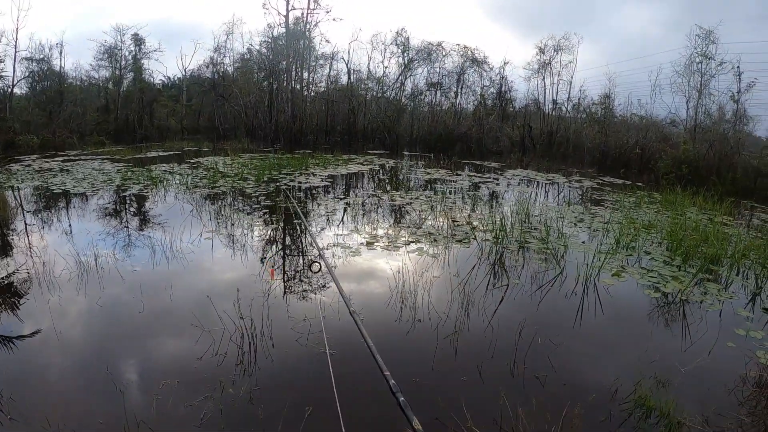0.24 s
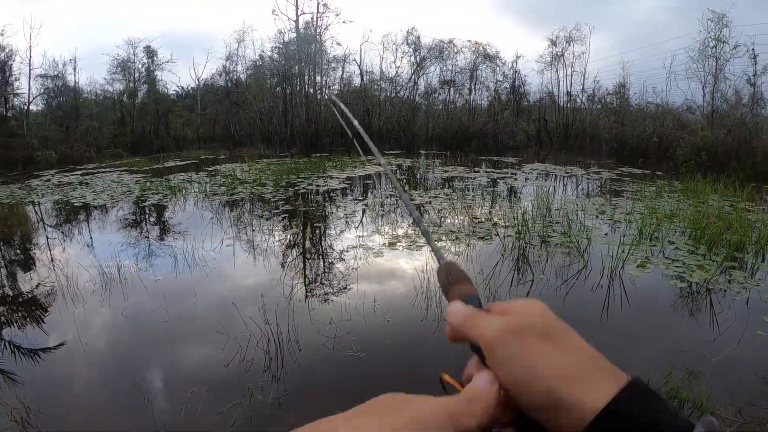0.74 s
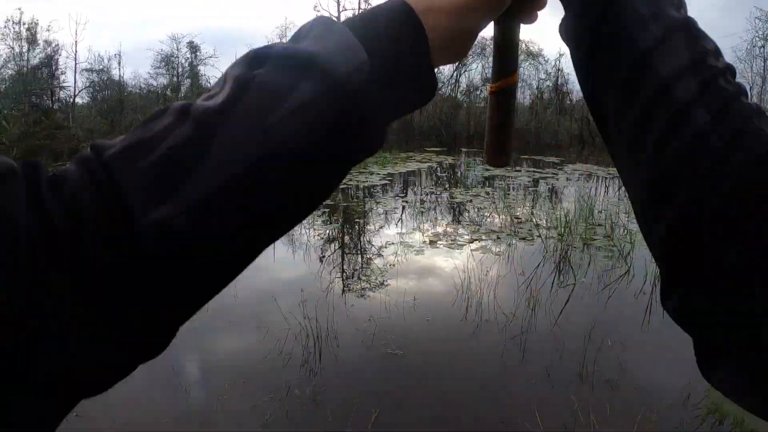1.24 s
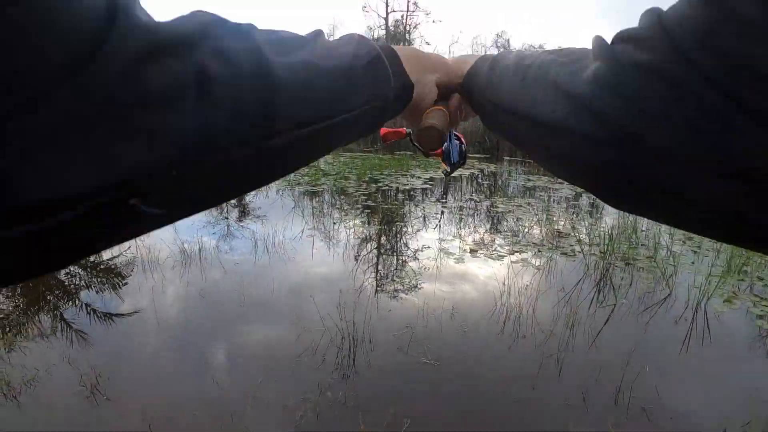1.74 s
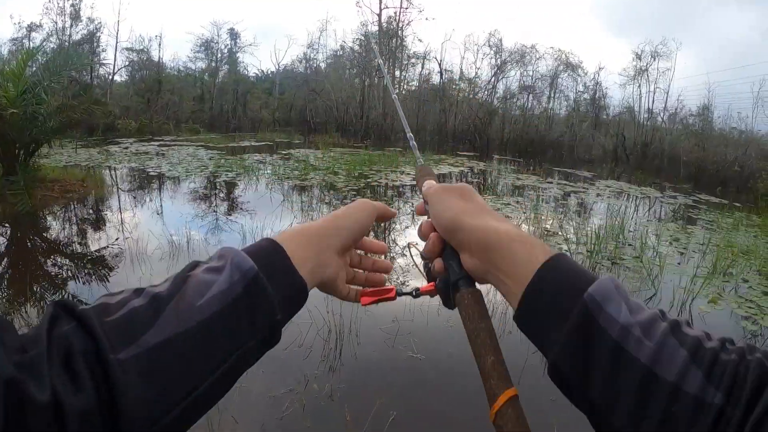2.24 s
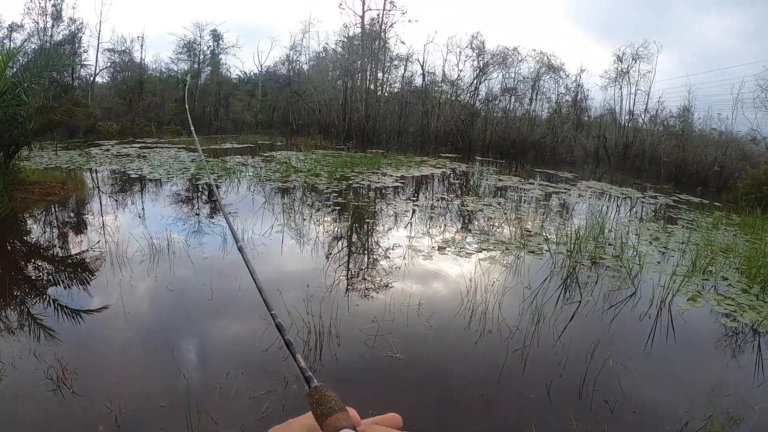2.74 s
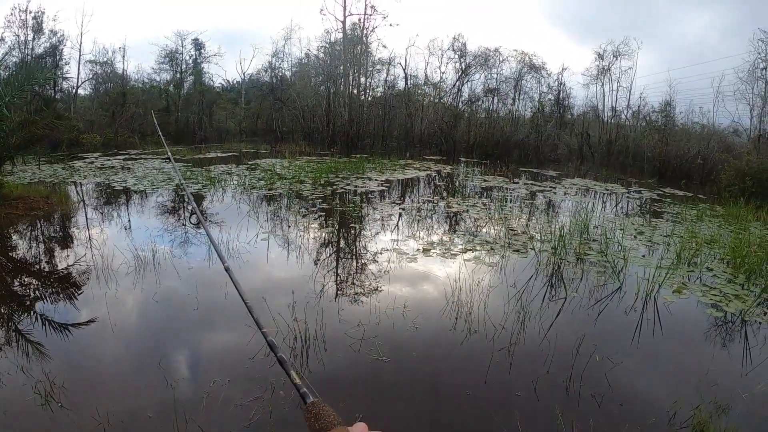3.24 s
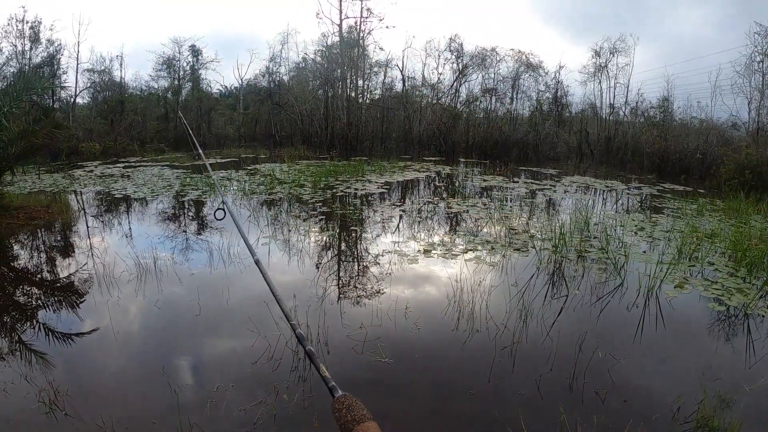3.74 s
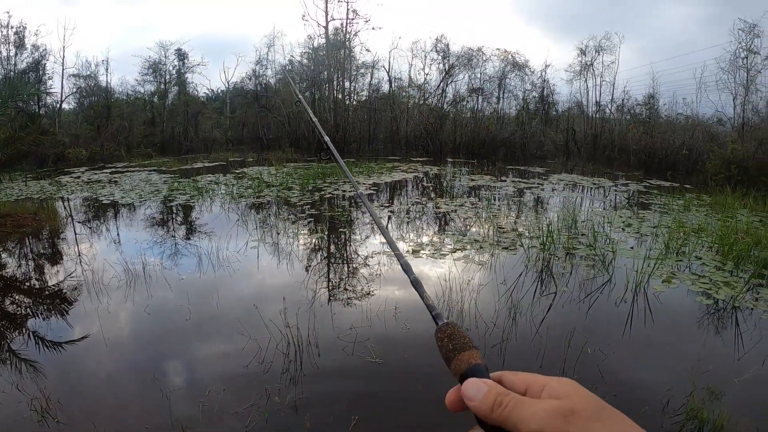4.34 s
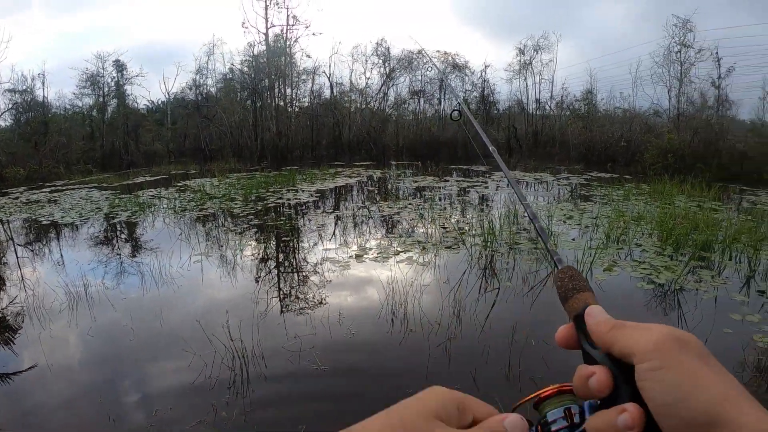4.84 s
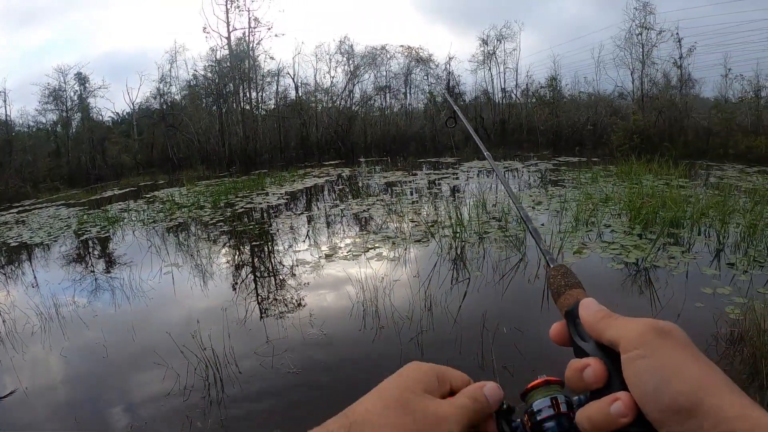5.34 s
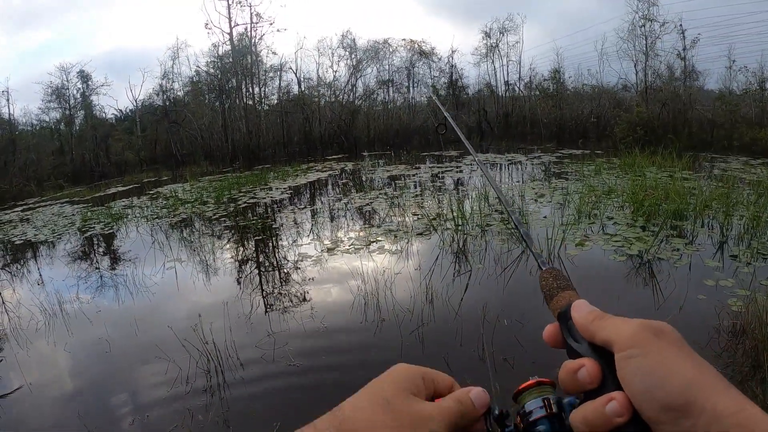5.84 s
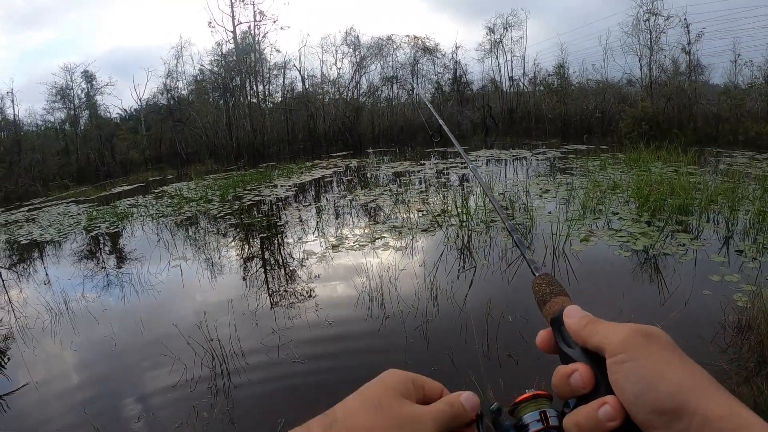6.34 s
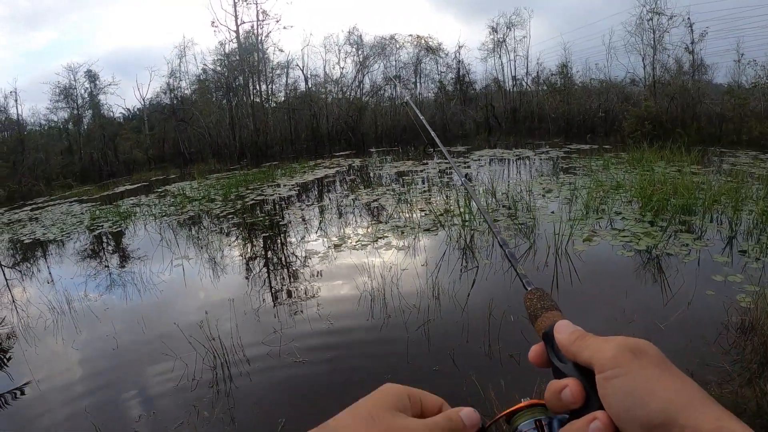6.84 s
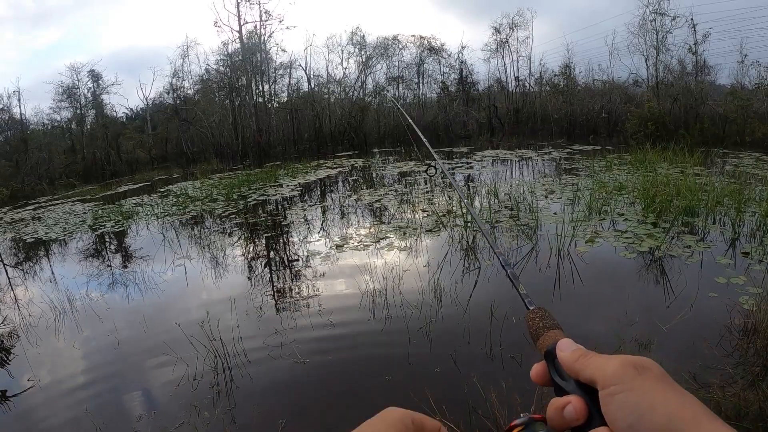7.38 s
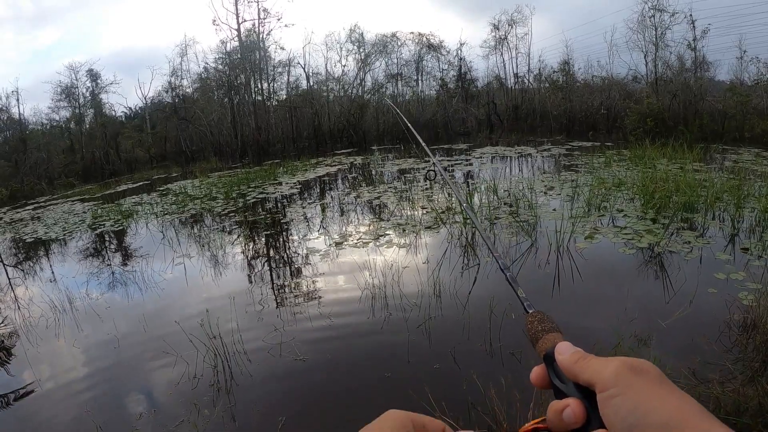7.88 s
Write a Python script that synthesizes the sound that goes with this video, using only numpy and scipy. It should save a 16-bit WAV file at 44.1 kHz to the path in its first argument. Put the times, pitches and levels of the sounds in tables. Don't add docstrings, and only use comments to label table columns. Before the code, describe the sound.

A bird repeats a short falling note among echoing chirps at a marshy pond, with one quick casting whoosh, line hiss and small tackle clicks.

```python
import sys
import numpy as np
from scipy import signal
from scipy.io import wavfile
from scipy.ndimage import uniform_filter1d

SR = 44100
rng = np.random.default_rng(int(sys.argv[2]) if len(sys.argv) > 2 else 0)


def natural_amplitude(level_db):
    exponent = np.asarray(level_db, float) / 20
    return 10 ** exponent


def to_wav(sig):
    pcm = np.clip(np.atleast_2d(sig), -1, 1) * 32767
    pcm = np.round(pcm).astype(np.int16)
    wavfile.write(sys.argv[1], SR, pcm.T)


N = 357651
T = np.arange(N) / SR

# after_start_s, pitch_hz, level_db
FALLING_NOTE = [(0.0, 4250, -2), (.008, 5236, 10.5), (0.015, 5673, 3), (.019, 5557, 10), (.027, 5290, 5.5),
                (.04, 5040, 4.5), (.066, 4250, 3), (0.079, 3750, -1), (0.101, 3060, -7)]
# start_s, level_db, hook_db, loss_by_end_db, stretch_ratio
FALLING_NOTE_REPEATS = [(0.687, -36.5, -33, 9.5, 0.85), (1.327, -47, -20, 5, 1.16),
                        (1.985, -46, -24, -4.5, 1.1), (2.651, -42, -13, 4, 1.06),
                        (3.304, -36, -32, 3, 0.86), (3.989, -38, -7.5, 5, 1.08),
                        (4.681, -39.5, -5, -2, 0.99), (6.072, -36.5, -17, 4, 0.96),
                        (6.855, -38.5, -11, -2, 0.96), (7.682, -34, -7.5, 10, 1.16)]
# after_start_s, pitch_hz, level_db
WARBLE_FIGURE = [(0, 2904, -6), (.07, 3150, -2.5), (.27, 2960, -3), (.3, 3400, 2.5), (.33, 3640, 5.5),
                 (.37, 3646, -17)]
CLIMB_FIGURE = [(0, 3936, -3), (.008, 4100, 5), (.014, 4876, -3), (.022, 4400, 7.5), (.032, 4980, 4),
                (.039, 4510, -4), (.05, 5300, -6), (.057, 4850, 8), (.068, 4830, -5), (.074, 5800, 0),
                (.084, 4870, -13)]
STAIRS_FIGURE = [(0, 4606, -1.5), (.065, 4324, 4.5), (.098, 3950, -1.5), (.108, 3850, -5), (.122, 3624, 3),
                 (.2, 3540, 4.5), (.232, 3400, 5), (.245, 2930, -3), (.272, 2330, -14)]
# start_s, stretch_ratio, level_db, left_right_db
WARBLE_TIMES = [
    (.105, 1.03, -36.5, 3.5),
    (6.671, .96, -37, 4),
]
CLIMB_TIMES = [
    (1.175, 1.001, -38.5, 0.1),
    (7.699, 1.01, -46, 0.92),
]
STAIRS_TIMES = [
    (1.398, 1.001, -37, 1.5),
    (7.93, 1.05, -40.5, 4.1),
]
# from_s, to_s, wobbles_per_s, depth_hz, around_hz
WOBBLES = [(.17, .247, 17.6, 130, 3150), (.247, .385, 30.5, 171, 3150), (4.735, 4.94, 28.5, 129, 3150),
           (6.765, 6.915, 30.7, 139, 3150)]
# start_s, length_s, first_hz, last_hz, level_db
LEFT_SLURS = [(.725, .055, 3420, 2680, -34.5), (.884, 0.094, 4110, 2570, -35.5),
              (1.09, 0.075, 4620, 3700, -36.5), (7.412, .075, 3790, 2510, -36.5),
              (7.613, 0.086, 4440, 3880, -35.5)]
RIGHT_SLURS = [(.273, 0.049, 2580, 2160, -50), (.53, 0.11, 2160, 1997, -49), (.605, 0.17, 2920, 2576, -43),
               (.79, 0.025, 2830, 3080, -53), (.81, 0.022, 3090, 2800, -40), (.8, 0.029, 4640, 4100, -41),
               (5.06, 0.042, 2120, 1998, -42), (5.45, 0.23, 3640, 3780, -47),
               (3.63, 0.096, 3650, 2900, -54), (5.787, 0.11, 4180, 3840, -52),
               (5.879, 0.0723, 3400, 2835, -42.5), (5.977, 0.091, 2700, 2087, -45.5),
               (6.147, 0.063, 2080, 1926, -45), (6.318, 0.043, 3070, 2820, -43.5),
               (6.388, 0.032, 3070, 2880, -41.5)]
# start_s, length_s,
# first_hz, last_hz, level_db
HELD_NOTES = [(0.089, 0.013, 2880, 3370, -34), (1.728, .045, 7950, 7850, -42),
              (1.845, 0.028, 3130, 2945, -34), (.09, .065, 4100, 3910, -41), (.388, .085, 2270, 2100, -46),
              (7.148, 0.18, 2710, 2668, -38.5)]
# left_right_db, then rows of start_s, pitch_hz, level_db
SINGLE_CALLS = [
    (0.1, [(.048, 4700, -34), (.055, 4200, -35.5), (.062, 3900, -23)]),
    (-5, [(1.88, 2556, -39), (1.9, 2690, -35), (1.925, 2535, -35.5), (1.955, 1800, -46), (1.995, 1490, -46)]),
    (-4, [(4.675, 3240, -48.5), (4.76, 3190, -43), (4.94, 3127, -45)]),
    (0, [(5.088, 2100, -53), (5.159, 2916, -45.5), (5.219, 2980, -42.5), (5.289, 2770, -46)]),
    (-2, [(5.422, 4510, -39), (5.43, 5270, -40), (5.438, 4235, -35), (5.45, 3340, -42), (5.465, 3050, -47), (5.485, 3070, -42), (5.52, 2730, -51)]),
]
# first_s, last_s, notes_per_s, top_hz, level_db
TRILLS = [(.062, .07, 50.0, 4600, -43), (4.968, 5.18, 16.0, 3850, -48), (3.871, 4.135, 27.3, 3620, -44),
          (2.9, 2.96, 23.0, 5500, -54), (3.12, 3.19, 23.0, 5400, -54), (3.59, 3.66, 23.0, 5300, -54),
          (3.797, 3.9, 25.0, 5300, -53), (4.085, 4.17, 25, 5200, -51), (4.17, 4.21, 27.3, 3450, -50),
          (4.381, 4.44, 26, 5300, -52), (4.66, 4.68, 23.0, 5200, -49)]
# start_s, peak_db
SQUEAKS = [(0.0715, -32.5), (0.3912, -30), (0.484, -35.5), (0.8177, -31.5), (1.121, -34.5), (1.268, -50),
           (1.324, -36)]
# start_s, low_hz, level_db, high_until_s, length_s
LOUD_CRIES = [
    (3.946, 1035, -28, 0.13, 0.128),
    (4.168, 1009, -28.5, 0.175, 0.361),
]
# start_s, length_s, first_hz, last_hz, level_db
SOFT_CRIES = [(3.7, 0.16, 888, 930, -50.5), (4.85, 0.089, 970, 1097, -50), (4.92, 0.082, 1104, 987, -49)]
# start_s, depth_db
THROAT_CLOSINGS = [(3.955, 6), (3.993, 15), (4.011, -1), (4.076, 11), (4.19, -1), (4.22, 3), (4.256, 3),
                   (4.29, 5), (4.308, 20), (4.337, 3), (4.355, 16), (4.386, 8), (4.424, 9), (4.455, 11),
                   (4.495, 8)]
# start_s, length_s, first_hz, last_hz, level_db
HOARSE_CALLS = [(3.97, 0.16, 2250, 2330, -58.5), (3.7, 0.18, 1736, 1843, -49.5),
                (3.9, .1, 1953, 1880, -57.5), (4.17, 0.2, 1996, 1953, -51.5),
                (4.38, 0.27, 1960, 1920, -48.5), (4.66, .08, 1887, 1840, -48.5),
                (4.81, 0.098, 1696, 1860, -46), (5.1, 0.1, 1695, 1690, -50), (5.5, 0.17, 1700, 1690, -52)]
# time_s, level_db
ROD_WHISTLE = [(1.6, -77), (1.63, -47), (1.645, -40), (1.675, -45), (1.694, -45), (1.708, -49),
               (1.724, -36), (1.733, -34), (1.753, -14.5), (1.764, -17), (1.79, -16.5), (1.815, -25),
               (1.83, -34), (1.843, -33), (1.85, -18), (1.856, -40), (1.863, -22), (1.88, -40)]
# start_s, attack_s, hold_s, release_s, level_db
SWING_BURSTS = [
    (1.715, 0.021, 0.023, 0.067, -28.5),
    (1.84, 0.01, 0.008, 0.01, -27.5),
]
# start_s, attack_s, hold_s, release_s, level_db
LINE_HISS = [(.7, 0.9, .005, 0.036, -53.5), (1.87, 0.042, 0.97, 0.14, -49.5), (1.9, .5, 0.041, 0.52, -51.5),
             (3.32, 0.048, 0.049, 0.022, -56.5), (3.54, 0.032, 0.074, 0.25, -60)]
# pitch_hz, level_db_per_hz
LINE_COLOUR = [(4470, -3.5), (7600, -25.5), (8870, -8), (10300, -15), (11900, -15), (15600, -25)]
# start_s, attack_s, hold_s, release_s, level_db
SPLASHES = [
    (2.4, 0.32, 0.0046, 0.17, -40.5),
    (3.36, 0.037, 0.012, 0.044, -40.5),
]
# start_s, peak_db, body_hz, body_db, left_right_db
TICKS = [(0.0772, -49, 1310, -18, -11), (0.0862, -50, 4900, -16.5, 0), (4.987, -70, 3500, -22, -2),
         (5.555, -72, 4500, -36, 0), (1.27, -41, 4070, -45, 0), (1.846, -37, 2560, -30, 12),
         (1.853, -43, 2000, -34, 6), (1.8638, -44, 2780, -35, -2), (2.1712, -49, 2810, -16.5, -6),
         (2.1758, -38.5, 3870, -16, -4), (2.2194, -54, 3700, -19.5, 4), (2.905, -52, 3930, -18.5, 2),
         (3.001, -43, 2450, -23.5, 1), (3.8487, -43.5, 2210, -27, -2), (4.3496, -78, 2970, -24, -14),
         (5.03, -43, 3640, -20.5, 3), (5.284, -37.5, 2730, -18, 2), (5.4694, -31.5, 3110, -17.5, -5),
         (5.7593, -44, 2790, -25, 2), (5.9809, -46, 2900, -20, -4), (6.2718, -42, 4440, -41, 4),
         (6.3648, -71, 2960, -23.5, -3), (6.787, -39, 4844, -47, 13), (7.7861, -37.5, 3960, -21, 5),
         (7.8695, -72, 3980, -27, -8)]
# start_s, peak_db, pitch_hz, t60_s, left_right_db
PLOPS = [(0.076, -23.5, 2900, 0.021, -7), (0.0815, -27.5, 1000, 0.012, -2), (0.082, -25, 358, 0.021, 0),
         (.222, -45, 1830, .04, 2), (0.692, -25.5, 180, 0.12, -3), (0.693, -33.5, 427, 0.066, -5),
         (3.39, -27, 1400, 0.01, 1), (3.406, -30, 1070, 0.028, 1), (3.42, -26.5, 670, 0.029, -5),
         (5.291, -21, 1440, 0.012, -5), (5.345, -19.5, 810, 0.01, 3), (5.397, -27.5, 1230, 0.043, 3),
         (6.3, -41.5, 605, 0.062, -4), (7.641, -38, 560, 0.046, -3), (7.748, -25, 207, 0.02, -3)]
# start_s, attack_s, hold_s, release_s, level_db
ARM_GUSTS = [(.9, 0.17, 0.13, 0.167, -47), (1.71, 0.038, 0.037, 0.039, -35), (3.55, 0.064, 0.08, 0.14, -59),
             (7.48, 0.13, 0.074, 0.067, -49)]
# start_s, attack_s, hold_s, release_s, level_db
SWING_THUMP = [
    (1.725, 0.02, 0.049, 0.021, -20),
]
# time_s, level_db
WIND = [(0.0, -43), (0.92, -46), (1.24, -37.5), (1.71, -37), (1.77, -43), (1.84, -32), (2.05, -40.5),
        (4.61, -45), (5.17, -50.5), (6.57, -44.5), (8.11, -46)]
# time_s, level_db
ENGINE = [(0.0, -30), (0.13, -70), (1.24, -37.5), (1.7, -40), (2.0, -42.5), (2.39, -48.5), (2.73, -33),
          (2.89, -62.5), (5.58, -58.5), (7.2, -37.5), (8.11, -47)]
# time_s, level_db
FAR_CHORUS = [(0.0, -40.5), (.3, -42.5), (1.45, -40.5), (1.69, -31.5), (2.19, -43.5), (2.8, -42),
              (3.1, -45.5), (3.3, -47.5), (3.6, -43), (4.67, -43), (4.95, -38.5), (5.7, -38), (6.6, -43),
              (7.3, -40), (8.11, -39.5)]
# pitch_hz, level_db_per_hz
AIR_COLOUR = [(180, -29), (300, -12), (404, -6.5), (823, -11.5), (1310, 1), (1910, -11), (2890, -2),
              (3900, -9), (4830, -3), (5890, -12.5), (7070, -10.5), (7680, -16.5), (10300, -20),
              (11200, -9), (15600, -73)]
# pitch_hz, likeness_ratio
LIKENESS = [(60, 1), (150, 0.94), (380, 0.088), (950, 0.76), (2380, 0.35), (5980, 0.059), (15000, 0.075)]
# pitch_hz, left_right_db
TILT = [(60, -2.5), (380, 3), (2380, -5), (15000, 0)]


def in_time(rows):
    s, *columns = np.transpose(rows)
    gate = np.interp(T, [s[0] - .03, s[0], s[-1], s[-1] + 0.017], [0, 1, 1, 0])
    return [np.interp(T, s, column) for column in columns], gate


def at_hz(points, hz):
    table = np.array(points)
    return np.interp(np.log(hz), np.log(table[:, 0]), table[:, 1])


def rms_one(x):
    return x / np.sqrt(np.mean(x ** 2) + 1e-20)


def band(x, lo_hz, hi_hz, order=2):
    return signal.sosfilt(signal.butter(order, [lo_hz, hi_hz], "band", fs=SR, output="sos"), x)


def balance(left_right_db):
    return natural_amplitude(left_right_db / 2 * np.array([[1], [-1]]))


def drift(rate_hz):
    r = np.exp(-80 * np.pi * rate_hz / SR)
    slow = signal.lfilter([1], [1, -2 * r, r * r], rng.standard_normal(N // 40 + 2002))
    slow = slow[2000:]
    return np.interp(np.arange(N) / 40, np.arange(len(slow)), rms_one(slow))


def pair(hz):
    mid, side = rng.standard_normal((2, N))
    alike = np.clip(at_hz(LIKENESS, hz), 0, 1)
    both = np.sqrt((1 + alike) / 2) * mid + np.sqrt((1 - alike) / 2) * side * [[1], [-1]]
    return both * balance(at_hz(TILT, hz))


def coloured(spectrum, lo_hz, patchy_db, count, swell_db=0):
    edges = np.geomspace(lo_hz, 15900, 3 * count + 1)
    whites = [[pair(hz), pair(hz)] for hz in edges[count // 2::count][:3]]
    out = 0
    for k, (low, high) in enumerate(zip(edges, edges[1:])):
        level_db = at_hz(spectrum, np.sqrt(low * high)) + patchy_db * drift(12.2)
        level_db = level_db + swell_db * (1800 < low < 4700)
        white = whites[k // count][k % 2]
        out = out + natural_amplitude(level_db) * band(white, low, high)
    return rms_one(out)


def swell(rows):
    out = 0
    for s, attack, hold, release, level_db in rows:
        times = s + np.cumsum(np.maximum([0, attack, hold, release], 1e-4))
        (db,), gate = in_time(np.transpose([times, level_db - 16 * np.array([1, 0, 0, 1])]))
        out = out + gate * natural_amplitude(db)
    return out


def add(out, s, x, left_right_db):
    i = round(s * SR)
    x = x[:N - i]
    out[:, i:i + len(x)] += x * balance(left_right_db)


def whistles(notes, flutter_db, warbles=(), pulse=0.0, jitter_hz=0.0):
    out = np.zeros((2, N))
    flutter, jitter = flutter_db * drift(49), jitter_hz * drift(92)
    for left_right_db, rows in notes:
        s, hz, level_db = np.transpose(rows)
        t = np.arange(s[0], min(s[-1], T[-2]), 1 / SR)
        first = round(s[0] * SR)
        now = slice(first, first + len(t))
        pitch = uniform_filter1d(np.interp(t, s, hz), size=151, mode="nearest") + jitter[now]
        breaks = 1
        for start, end, rate, depth_hz, around_hz in warbles:
            inside = (t > start) & (t < end) & (abs(hz.mean() / around_hz - 1) < .1)
            phase = 2 * np.pi * rate * (t - start)
            pitch = pitch + inside * depth_hz * (np.sin(phase) - 0.32 * np.sin(2 * phase))
            breaks = breaks + inside * 0.18 * np.sin(phase + 0.44)
        edge = np.clip(np.minimum(t - s[0], s[-1] - t) / .006, 0, 1)
        edge = edge * (1 + pulse * np.sin(2 * np.pi * 29.5 * (t - s[0])))
        gain = np.sqrt(2) * edge * breaks * natural_amplitude(np.interp(t, s, level_db) + flutter[now])
        add(out, s[0], gain * np.sin(2 * np.pi * np.cumsum(pitch) / SR), left_right_db)
    return out


def slurs(rows, left_right_db, bend, fade_db=0):
    u = np.linspace(0, 1, 12)
    shape_db = np.interp(u, [0, 0.45, 1], [-5, 0, -3.5]) + fade_db * (u - .5)
    notes = []
    for s, length, first, last, level_db in rows:
        pitch = last + (first - last) * (1 - u) ** bend
        notes.append((left_right_db, np.transpose([s + length * u, pitch, level_db + shape_db])))
    return notes


def dash(top_hz, fall_hz, length_s, rattle=0):
    u = np.arange(0, 1, 1 / (length_s * SR))
    loudness = np.sin(np.pi * u) * (1 - rattle * np.cos(4 * np.pi * u))
    return loudness * np.sin(2 * np.pi * np.cumsum(top_hz - fall_hz * u) / SR)


def woods(x, t60_s, wet_db):
    t = np.arange(SR) / SR
    shared, left, right = rng.standard_normal((3, SR))
    tail = shared + 1.76 * np.array([left, right])
    tail = tail * natural_amplitude(-60 * t / t60_s) * np.clip(t / 0.0041, 0, 1)
    tail /= np.sqrt(np.sum(tail ** 2, axis=1, keepdims=True))
    return x + natural_amplitude(wet_db) * signal.fftconvolve(x, tail, axes=1)[:, :N]


def falling_notes():
    notes = []
    for s, level_db, hook_db, loss_db, stretch in FALLING_NOTE_REPEATS:
        rows = np.array(FALLING_NOTE) * [stretch, 1, 1] + [s, 0, level_db]
        rows[:2, 2] += hook_db
        rows[:, 2] -= loss_db * (rows[:, 0] - s) / (rows[-1, 0] - s)
        notes.append((-1.3, rows))
    direct = whistles(notes, flutter_db=3.0, jitter_hz=45.0)
    water_echo_s, water_echo_db = 1 / 850, -7.0
    return direct + natural_amplitude(water_echo_db) * np.roll(direct, round(water_echo_s * SR), axis=1)


def songs():
    notes = []
    for figure, times in ((WARBLE_FIGURE, WARBLE_TIMES), (CLIMB_FIGURE, CLIMB_TIMES),
                          (STAIRS_FIGURE, STAIRS_TIMES)):
        for s, stretch, level_db, left_right_db in times:
            notes.append((left_right_db, np.array(figure) * [stretch, 1, 1] + [s, 0, level_db]))
    notes += slurs(LEFT_SLURS, 3.5, bend=1.5, fade_db=-3.5)
    notes += slurs(RIGHT_SLURS, -4.5, bend=2.87)
    notes += slurs(HELD_NOTES, 3.0, bend=4.64)
    notes += SINGLE_CALLS
    return whistles(notes, flutter_db=2.0, warbles=WOBBLES, jitter_hz=15.0)


def small_birds():
    out = np.zeros((2, N))
    for first, last, rate, top_hz, level_db in TRILLS:
        for s in np.arange(first, last, 1 / rate):
            swell_db = -35 * (last - s)
            note = dash(top_hz, .16 * top_hz, .023)
            add(out, s, 2 * natural_amplitude(level_db + swell_db) * note, -1.5)
    for s, peak_db in SQUEAKS:
        add(out, s, natural_amplitude(peak_db) * dash(6400, 1730, 0.0133, rattle=0.5), -3.0)
        add(out, s, natural_amplitude(peak_db - 1.0) * dash(4600, 970, 0.0169, rattle=0.46), -3.0)
    return out


def large_bird_cries():
    notes = slurs(SOFT_CRIES, -2.0, bend=2.2)
    gulp_s, jump_s, jump_ratio, fade_db_per_s = 0.0368, 0.0336, 1.125, 29
    for s, hz, level_db, high, length in LOUD_CRIES:
        t = np.array([0, gulp_s, gulp_s + jump_s, gulp_s + 2 * jump_s, high, high + jump_s, length])
        ratio = np.array([.955, 1, jump_ratio, jump_ratio, jump_ratio, 1, .955])
        shape_db = np.array([-12, 0, -7, 0, 0, 0, -8]) - fade_db_per_s * np.maximum(t - gulp_s, 0)
        notes.append((-.55, np.transpose([s + t, hz * ratio, level_db + shape_db])))
    closing_s = 0.0061
    closed_db = sum(depth_db * np.exp(-((T - s) / closing_s) ** 2) for s, depth_db in THROAT_CLOSINGS)
    return natural_amplitude(-closed_db) * whistles(notes, flutter_db=3.5, jitter_hz=22)


def hoarse_calls():
    return whistles(slurs(HOARSE_CALLS, -2, bend=3), flutter_db=4.5, pulse=.3, jitter_hz=60)


def breath_rasp(cry):
    effort = np.abs(uniform_filter1d(np.abs(cry), size=4001)) ** .5
    return natural_amplitude(-28.5) * effort * rms_one(band(pair(1700), 1220, 1900))


def rod_swish():
    (whistle_db,), gate = in_time(ROD_WHISTLE)
    slack_db = whistle_db - whistle_db.max()
    hiss_db = -35 + 0.28 * slack_db
    whoosh_db = -27 + 0.55 * slack_db
    out = natural_amplitude(whistle_db) * rms_one(band(pair(1100), 2110, 2750))
    out = out + (natural_amplitude(hiss_db) + swell(SWING_BURSTS)) * rms_one(band(pair(6000), 1100, 6900))
    out = out + natural_amplitude(whoosh_db) * rms_one(band(pair(1050), 510, 1640))
    return gate * natural_amplitude(2.6 * drift(120)) * out


def line_and_bait():
    hiss = coloured(LINE_COLOUR, 4500, patchy_db=.4, count=2)
    wash = rms_one(band(pair(1200), 400, 2600))
    return swell(LINE_HISS) * hiss + swell(SPLASHES) * wash


def tackle():
    out, t = np.zeros((2, N)), np.arange(2200) / SR
    cracks = rng.standard_normal((len(TICKS), 2200)) * (natural_amplitude(-60 * t / 0.0054) + natural_amplitude(-20 - 60 * t / 0.04))
    ring = natural_amplitude(5.5) * band(cracks, 8560, 8800)
    fizz = natural_amplitude(-11.5) * band(cracks, 11000, 15000)
    cracks = band(cracks, 3300, 10300, order=3) + ring + fizz
    for (s, peak_db, hz, body_db, left_right_db), crack in zip(TICKS, cracks):
        body = natural_amplitude(body_db - 60 * t / 0.0024) * np.sin(2 * np.pi * hz * t)
        add(out, s, natural_amplitude(peak_db + 15.0) * crack + body, left_right_db)
    for s, peak_db, hz, t60, left_right_db in PLOPS:
        fading = natural_amplitude(peak_db - 60 * t / t60) * np.clip(t / 0.00023, 0, 1)
        add(out, s, fading * np.sin(2 * np.pi * hz * t * (1 + 0.67 * t)), left_right_db)
    return out


def insects():
    beat = 2 * np.pi * np.cumsum(12.9 + 0.27 * drift(0.93)) / SR
    pitch = 7010 + 330 * np.sin(beat) + 60.0 * drift(219)
    tone = np.sin(2 * np.pi * np.cumsum(pitch) / SR) * natural_amplitude(0.83 * drift(100))
    return natural_amplitude(-47.5) * rms_one(woods(np.array([tone, -tone]), .38, 4.0))


def wind():
    (buffet_db,), _ = in_time(WIND)
    rumble_db = -48.5 + 0.38 * (buffet_db + 45)
    lumps_db = 1.6 * drift(4.4)
    out = natural_amplitude(buffet_db + lumps_db + 2.0 * drift(4.4)) * rms_one(band(pair(95), 32, 87.7, order=3))
    rumble_gain = natural_amplitude(rumble_db + lumps_db + 2.4 * drift(4.9)) + swell(ARM_GUSTS)
    out += rumble_gain * rms_one(band(pair(270), 141.0, 304.6))
    thump = np.sin(2 * np.pi * 29.5 * (T - 1.747))
    return out + swell(SWING_THUMP) * thump * balance(-5)


def far_engine():
    (firing_db,), _ = in_time(ENGINE)
    drone_db = -44 - 1.15 * T
    firing = natural_amplitude(firing_db) * rms_one(band(pair(81), 101.0, 104.9, order=1))
    return firing + natural_amplitude(drone_db) * rms_one(band(pair(120), 147.6, 160.5, order=1))


def air():
    (chorus_db,), _ = in_time(FAR_CHORUS)
    hiss = coloured(AIR_COLOUR, 308, patchy_db=2.6, count=7, swell_db=chorus_db - chorus_db.mean())
    below = signal.sosfilt(signal.cheby1(6, 1, 10300, fs=SR, output="sos"), hiss)
    above = band(hiss, 10500, 14500, order=4)
    return natural_amplitude(-44.5) * (below + natural_amplitude(-11 + 3 * drift(18)) * above)


def scene():
    song = songs() + small_birds()
    cry = large_bird_cries()
    far_bird = cry + hoarse_calls() + breath_rasp(cry)
    birds = woods(falling_notes(), 0.74, -6.5) + woods(song, 1.0, -3.0) + woods(far_bird, .55, -5.0)
    cast = rod_swish() + line_and_bait()
    cast[1] = np.roll(cast[1], 2)
    return birds + cast + tackle() + insects() + wind() + far_engine() + air()


def top_cut(x):
    return signal.sosfilt(signal.butter(12, 15790, fs=SR, output="sos"), x)


def record(dry):
    level_db = 10 * np.log10(uniform_filter1d(np.mean(dry ** 2, axis=0), 2001) + 1e-12)
    excess_db = np.maximum(level_db + 31.5, 0)
    held_db = np.maximum.accumulate(excess_db + 13.4 * T) - 14.2 * T
    duck_db = 0.14 * signal.lfilter([.0004], [1, -.9996], held_db)
    dry = .55 * np.tanh(dry / .55)
    dry = signal.sosfilt(signal.cheby2(16, 60, 16150, fs=SR, output="sos"), dry)
    dry[1] = np.roll(dry[1], 1)
    return top_cut(dry * natural_amplitude(-duck_db))


dry = scene()
out = record(dry)
to_wav(out)
```